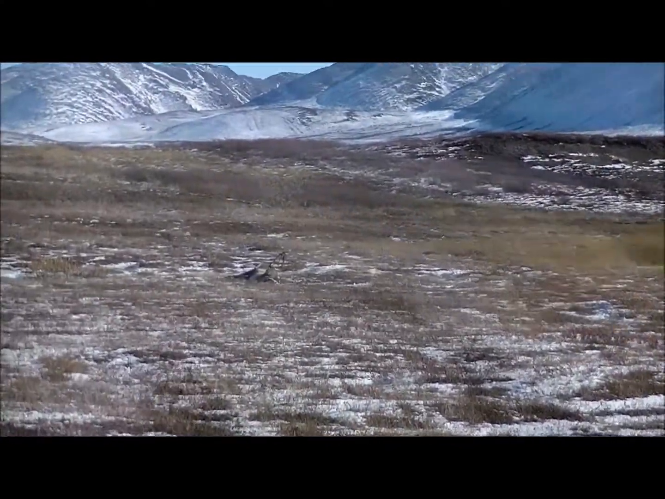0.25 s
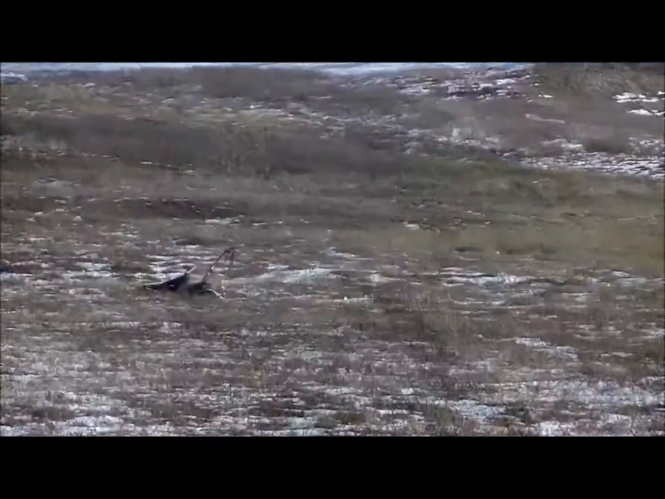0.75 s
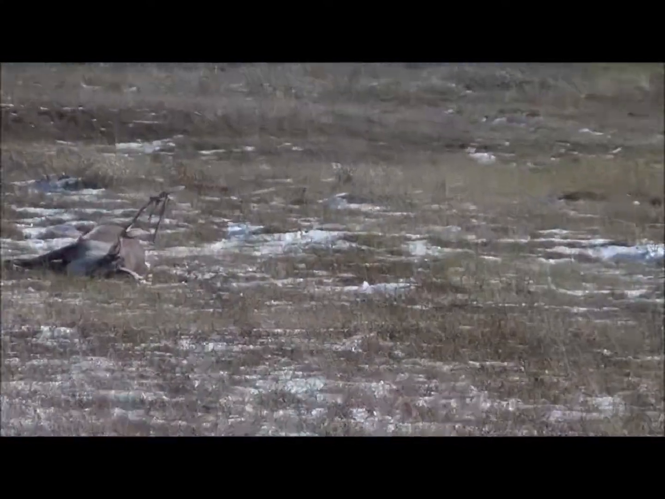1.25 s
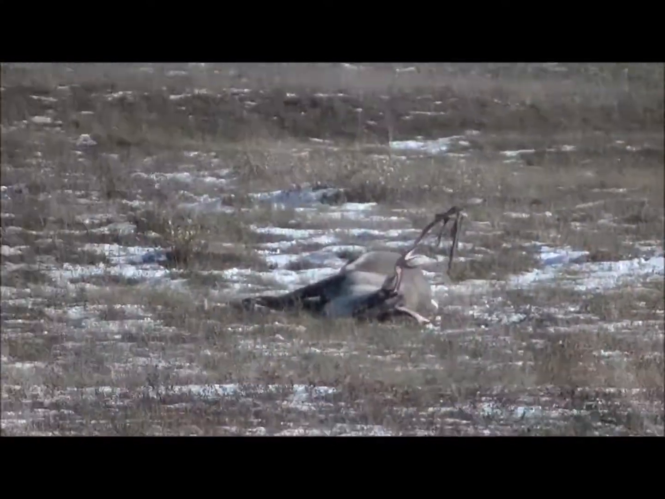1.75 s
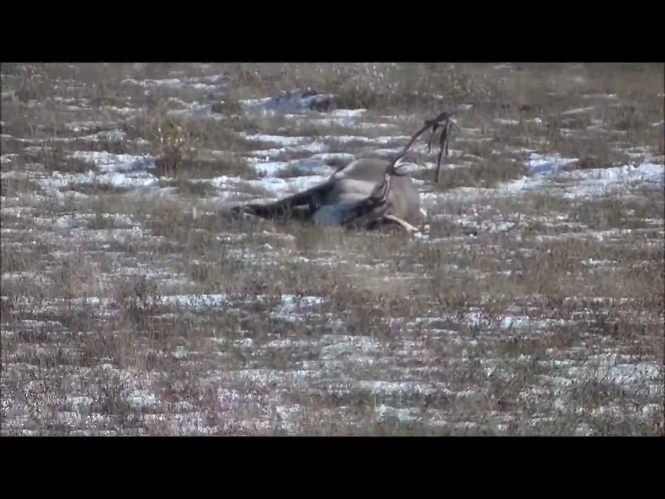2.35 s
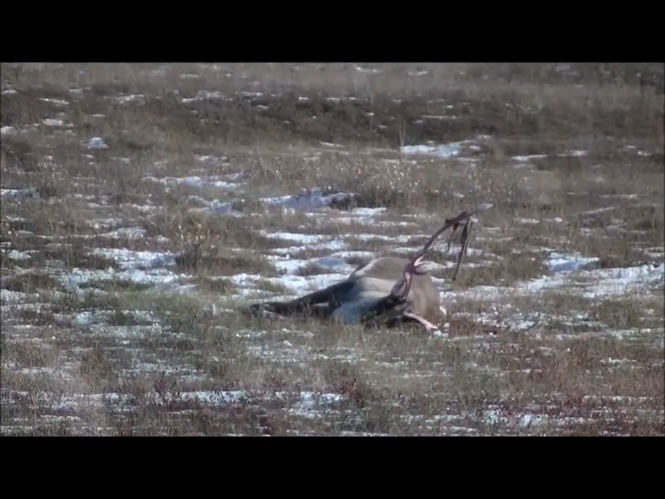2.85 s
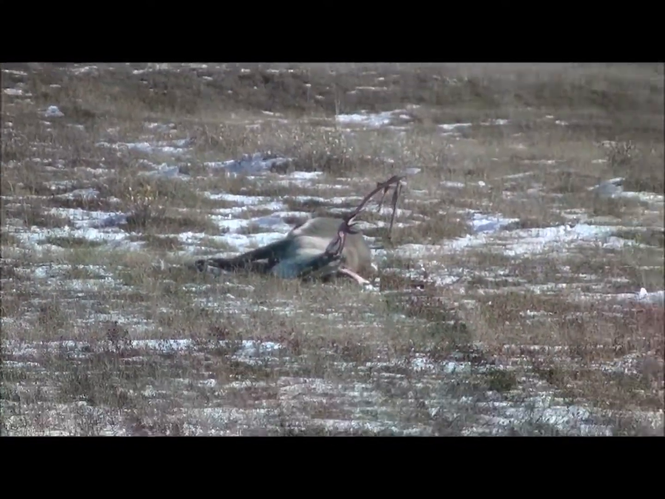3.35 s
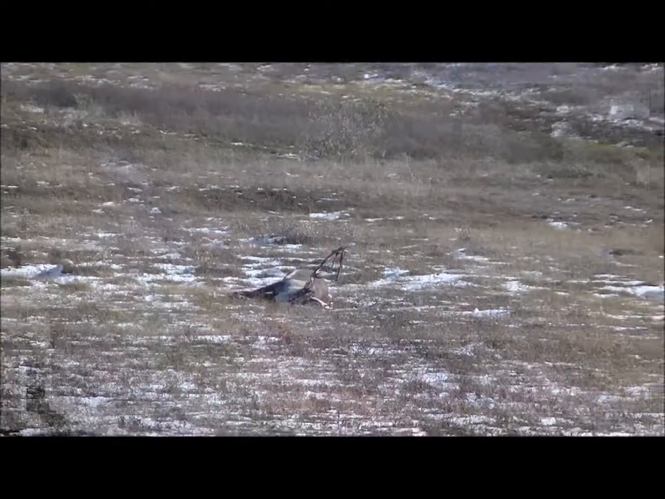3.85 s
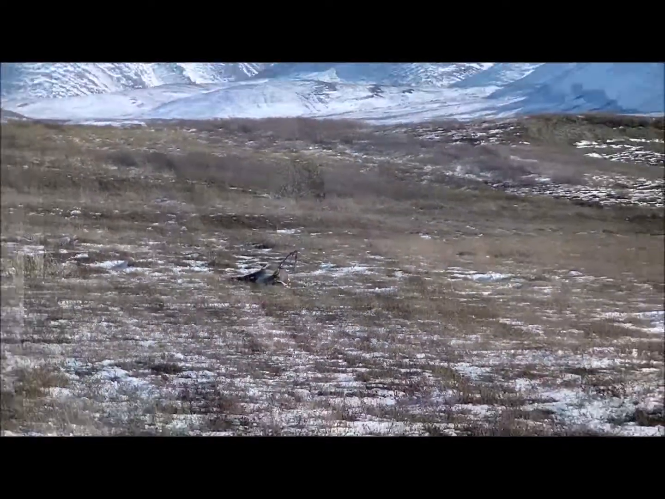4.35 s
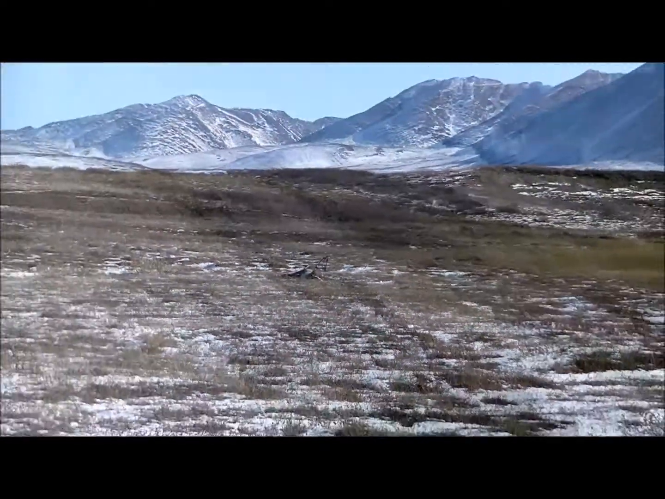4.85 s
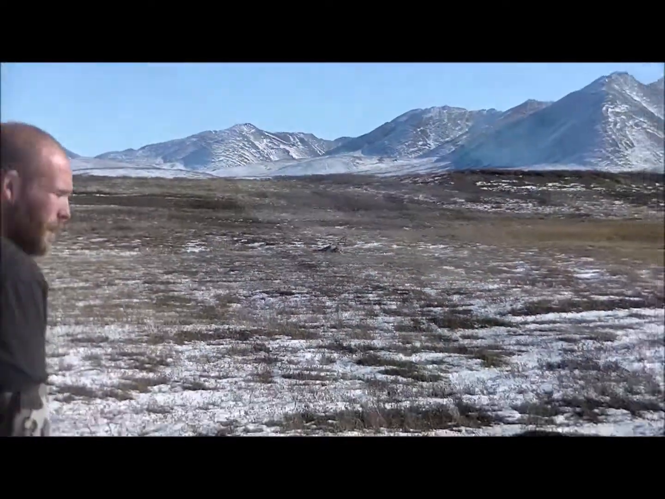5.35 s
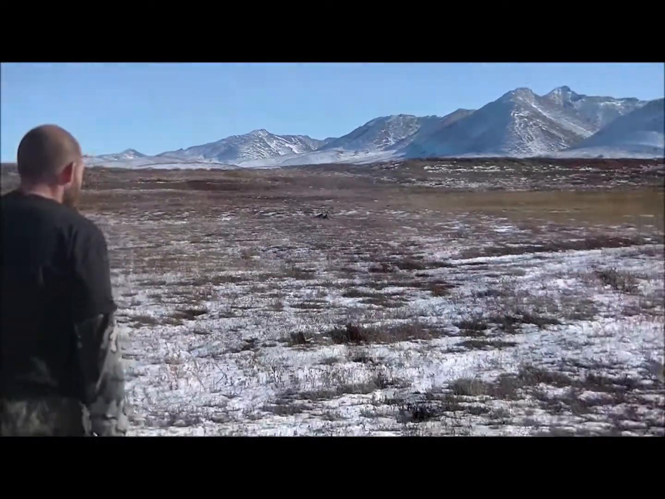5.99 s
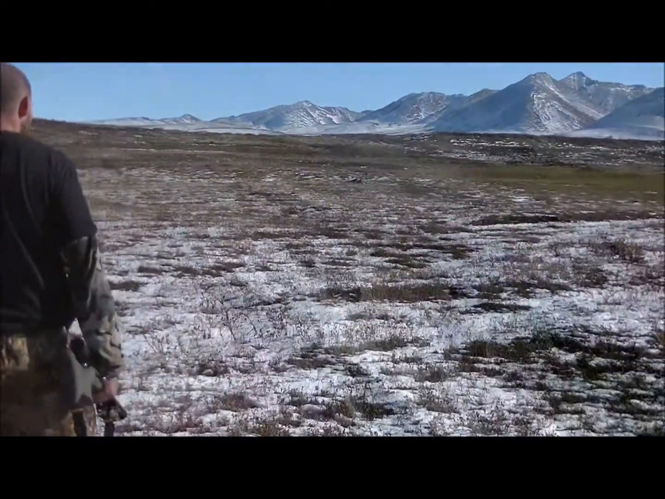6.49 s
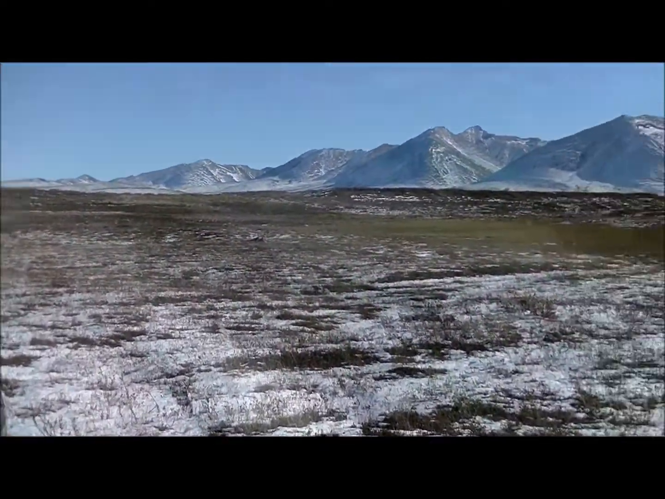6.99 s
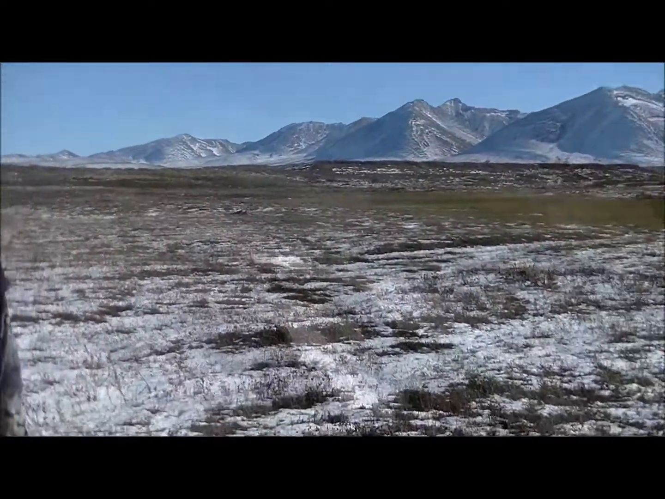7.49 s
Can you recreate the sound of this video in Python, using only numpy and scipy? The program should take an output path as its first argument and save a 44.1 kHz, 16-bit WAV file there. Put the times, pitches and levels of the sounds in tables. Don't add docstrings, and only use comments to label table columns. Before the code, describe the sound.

Very close, dry camera handling noise over soft microphone hiss. Light clicks and rubbing, a short steady motor whine, and a hard bright snap come first. Tiny rapid ticks chatter in the quieter gap. A second, nearly three-second motor run follows, smooth and slightly softer. It ends in heavy knocks and clicks, then scratchy scuffs and small taps continue to the end on open ground.

```python
import sys
import numpy as np
from scipy import signal
from scipy.fft import rfft, irfft
from scipy.io import wavfile
from scipy.ndimage import uniform_filter1d

SR = 44100
rng = np.random.default_rng(int(sys.argv[2]) if len(sys.argv) > 2 else 0)


def elevation(decibels):
    levels = np.asarray(decibels, float)
    return 10 ** (levels / 20)


def dump_mix(stems):
    frames = np.atleast_2d(stems).T
    limited = np.clip(frames, -1, 1)
    pcm = np.round(limited * 32767).astype(np.int16)
    wavfile.write(sys.argv[1], SR, pcm)


N = 340672
TIME = np.arange(N) / SR
HZ = np.fft.rfftfreq(N, 1 / SR) + 1
FIELD_HZ = 59.94


def on_log(points):
    hz, db = np.transpose(points)
    return np.interp(np.log(HZ), np.log(hz), db)


def noise(points, peaks=(), side_db=0.):
    # f/Hz, level/dB
    ports = [(60, -29), (300, -16.5), (700, -15), (1300, -18), (2400, -7.5), (4400, -5.5), (8000, -3),
             (15000, -3)]
    db = on_log(points)
    for centre_hz, width_hz, peak_db in peaks:
        db = db + peak_db / (1 + (2 * (HZ - centre_hz) / width_hz) ** 2)
    db = db - 18 * np.maximum(np.log2(points[0][0] / HZ), 0)
    mid, side = rfft(rng.standard_normal((2, N))) * elevation(db)
    side = side * np.minimum(elevation(on_log(ports) + side_db), 1)
    pair = irfft(np.array([mid + side, mid - side]), N)
    return pair / np.std(pair.mean(axis=0))


def walk(rate):
    hold = int(SR / rate)
    x = np.repeat(rng.standard_normal(N // hold + 1), hold)[:N]
    for _ in range(3):
        x = uniform_filter1d(x, hold)
    return x / x.std()


def curves(table):
    s, *columns = np.transpose(table)
    return [np.interp(TIME, s, column) for column in columns]


def swells(table):
    fade_db = 9.5
    return np.sqrt(sum(elevation(2 * (db - fade_db * np.abs(TIME - s) / length)) for s, db, length in table))


def add(out, s, sound, pan_db=0.):
    i = int(s * SR)
    sound = sound[..., :N - i]
    out[:, i:i + sound.shape[-1]] += sound * elevation(np.array([[pan_db], [-pan_db]]) / 2)


def microphone_hiss():
    # f/Hz, level/dB per Hz
    hiss = [(18, -36), (30, -2), (59, -4), (115, -3.5), (194, -11), (280, -3), (311, -6), (554, -10),
            (600, -19), (684, -21), (822, -12), (1130, -11.5), (4300, -9), (8080, -11), (16000, -18)]
    return elevation(-62.5 - 0.3) * noise(hiss, side_db=14.5)


def sensor_whistle():
    return elevation(-83) * np.sqrt(2) * np.sin(2 * np.pi * 131.25 * FIELD_HZ * TIME)


def hand():
    # f/Hz, level/dB per Hz
    bright_colour = [(1470, -11.5), (2500, 1), (3720, -6.5), (4840, 2.5), (6500, -4), (9580, -9.5),
                     (11400, -11.5), (15200, -17), (16000, -40)]
    dull_colour = [(350, -36), (500, -7), (800, -2.5), (1200, 0.5), (1800, 6.5), (2600, 4.5), (3600, 5),
                   (5000, -21)]
    cavity_colour = [(2800, -42), (3700, -6), (4400, 0), (4800, -1), (5300, -20), (6200, -50)]
    rumble_colour = [(12, -54), (20, -4), (59, -8), (125, -1), (184, -2.5), (392, -4), (520, -9.5),
                     (594, -28), (700, -25), (910, -55), (1540, -120)]
    # f/Hz, width/Hz, level/dB
    shell_peaks = [(7350, 770, 6.5), (9720, 1250, 11.5)]
    dull_peaks = [(1167, 43, 6.5), (1460, 35, 2), (1834, 140, 3.5), (2470, 92, 5.5)]
    # t/s, pressure/dB, sliding (airy above dull)/dB
    pressure = [(0, -61, 4.5), (.15, -56.5, -3), (.52, -55.5, -5.5), (1.31, -54, -7), (1.58, -55.5, 3.5),
                (1.76, -60, -13), (2.64, -75.5, -12), (3.1, -66, -6.5), (3.25, -54, -12), (3.53, -60, -7),
                (5.25, -59, -10.5), (6.05, -53, -4.5), (6.23, -50.5, -1), (6.45, -54, -2), (6.83, -47, -2),
                (7.12, -53, 0), (7.52, -51, -2), (7.6, -56.5, 0)]
    # t/s, peak/dB, length/s
    stroke_rows = [(.34, -51.5, 0.2), (.76, -52, 0.099), (1.44, -51.5, 0.04), (1.5, -65, .04),
                   (5.91, -58, 0.069), (6.19, -42.5, 0.016), (6.475, -54, .015), (6.53, -48, 0.027),
                   (6.56, -46, 0.04), (6.69, -48, .05), (6.74, -54, .015), (6.79, -47, 0.035),
                   (6.86, -43, 0.032), (6.94, -48, 0.025), (7.01, -49.5, 0.03), (7.035, -49, .012),
                   (7.35, -54, 0.13), (7.46, -49, .03)]
    shift_rows = [(0, -63.5, 0.13), (.23, -65, 0.24), (.75, -66.5, 0.35), (1.44, -56.5, 0.13),
                  (1.58, -62, 0.065), (2.0, -71.5, 0.31), (3.05, -65, 0.17), (5.31, -63.5, 0.19),
                  (5.61, -60, 0.17), (5.9, -55.5, 0.17), (6.07, -50.5, 0.033), (6.19, -40, 0.026),
                  (6.33, -45.5, 0.025), (6.43, -48, 0.012), (6.55, -43.5, 0.019), (6.9, -60, 0.68),
                  (7.16, -51, 0.034), (7.4, -62, .08), (7.55, -58.5, 0.12), (7.72, -61, 0.045)]

    dull_db, sliding_db = curves(pressure)
    strokes = swells(stroke_rows)
    scuff = walk(30)

    bright_gain = np.hypot(elevation(dull_db + sliding_db), strokes)
    bright = noise(bright_colour, shell_peaks) * bright_gain * elevation(-0.2 + 0.8 * scuff + 1.4 * walk(220))

    cavity_gain = np.hypot(elevation(dull_db + 0.64 * sliding_db - 2), elevation(-6.0) * strokes)
    cavity = noise(cavity_colour) * cavity_gain * elevation(-2.5 + 0.9 * scuff + 1.2 * walk(150))

    dull = noise(dull_colour, dull_peaks) * elevation(dull_db - 4.0 + 1.1 * scuff + 1.1 * walk(120))

    still_grip_db = -76
    rumble_gain = np.hypot(swells(shift_rows), elevation(still_grip_db))
    rumble = noise(rumble_colour) * rumble_gain * elevation(2.2 * walk(35))
    return bright + cavity + dull + rumble


def knocks():
    # t/s,
    # peak/dB, cycles, slap/dB
    palm = [(.016, -47, 0.75, -15), (1.986, -59, 1.8, -14), (3.73, -59, 1.3, -25), (4.862, -50, 1.1, -25),
            (6.24, -38.5, 2.3, -10), (6.322, -37.5, 1.4, -6), (6.41, -39.5, 0.55, -25),
            (6.537, -41, 1.1, -7), (7.366, -44.5, 0.67, -21), (7.426, -44.5, 0.93, -23),
            (7.53, -47.5, 0.8, -14)]
    thumb = [(1.42, -42, 0.65, -8), (1.498, -41, 1.8, -9), (1.53, -57, 5.6, -25), (1.822, -55, 0.94, -24),
             (3.211, -50.5, 1.5, -2), (3.272, -54, 3.9, -18), (5.296, -55, 0.9, 11), (6.06, -43.5, 0.65, 3),
             (6.109, -36, 0.6, -11), (6.184, -18.5, 1.53, -36), (6.19, -15, 0.5, -19), (7.691, -51, 0.6, 1)]
    knuckle = [(2.915, -39.5, 0.57, -1.5), (6.569, -44, 1.2, 5), (7.323, -47, 1.1, 1.5),
               (7.489, -42.5, 1.1, -13)]
    fingertip = [(.287, -54.5, 3.6, -25), (3.006, -34, 0.4, -18), (6.814, -51.5, 0.75, 6),
                 (6.978, -36, 0.51, -4), (7.031, -50, 0.48, 2.5), (7.161, -34, 1.14, -1.5),
                 (7.657, -51, 1.2, -17)]
    touches = [(palm, 134), (thumb, 238), (knuckle, 306), (fingertip, 407)]

    out, t = np.zeros((2, N)), np.arange(4096) / SR
    leather = signal.butter(3, (350, 1050), "band", fs=SR, output="sos")
    slap_s = .002
    for events, hz in touches:
        for s, db, cycles, slap_db in events:
            x = t * hz / cycles
            swing = x * np.exp(1 - x) ** 1.26 * np.sin(2 * np.pi * hz * t)
            burst = rng.standard_normal(4096) * t / slap_s * np.exp(1 - t / slap_s)
            slap = signal.sosfilt(leather, burst)
            swing = swing / np.abs(swing).max()
            slap = slap / np.abs(slap).max()
            add(out, s, elevation(db) * (swing + elevation(slap_db) * slap))
    return out


def clicks():
    # t/s, peak/dB, length/ms, left minus right/dB
    latch = [(.048, -27, 1.5, -2), (1.345, -31, 1.4, -4), (3.201, -25, 1.2, -3.5), (3.207, -35, 6, -1)]
    spring = [(1.166, -32, 4.9, -1.5), (1.334, -34, 3.7, -1), (7.44, -48, 5, -1)]
    body = [(.055, -43, 7.2, -1.5), (2.9155, -32, 1.3, -3), (5.297, -41.5, 5.8, 1)]
    rocker = [(1.168, -33, 1.4, -2), (1.198, -44, 2.6, -1.5), (1.506, -35.5, 2, 0), (1.584, -40, 5.6, -1),
              (5.379, -47, 2, 0), (6.0835, -18, 0.83, 1), (7.21, -44, 5.7, 5), (7.439, -31.5, 3.3, 1)]
    lens = [(.047, -30.5, 2.7, 2), (3.2, -31, 2, 2), (5.85, -36.5, 16, -4)]
    grip = [(.772, -38, 14, 2), (3.404, -56, 8.3, -.6), (5.85, -38, 17, 2), (6.058, -35, 19, 4),
            (6.176, -42, 8.1, -2), (6.185, -18.5, 2.9, -3.5), (6.192, -25, 2.3, 3), (6.2, -35.5, 16, 1)]
    port = [(.729, -38, 0.83, 2), (3.12, -56, 53, -1.1), (5.296, -37, 5.6, 3), (5.32, -53, 160, 3),
            (5.52, -53, 140, 3), (5.525, -46, 2.5, 3), (6.79, -43, 83, 3), (7.258, -37, 7.8, 2),
            (7.32, -51, 130, 3), (7.518, -31, 2, 2), (7.53, -40, 12, 16)]
    buckle = [(.283, -76, 2.9, -4), (1.49, -40, 0.89, -4), (2.575, -49.5, 29, -2.1), (6.56, -29, 0.61, 0),
              (6.595, -37, 1.2, -1)]
    clasp = [(.677, -33.5, .74, -6), (1.503, -31, .77, -1.5), (7.61, -43, 2.9, -9)]
    seam = [(.767, -27, .9, .1), (1.4384, -7, .9, 1), (3.0531, -37, .29, -15.5)]
    strap = [(7.146, -29.5, 23.5, 1)]
    hinge = [(6.95, -49, 126, .6)]
    barrel = [(1.668, -54, 8.6, 0), (1.696, -53, 7.2, 0), (1.732, -52, 11, 0), (1.762, -54, 7, 0),
              (1.906, -55, 6, 0), (1.93, -57, 8, 0)]
    grit = [(6.471, -41, 1.5, -1), (6.509, -35, 1.2, 0), (6.627, -37, 0.74, 1.5), (6.794, -41, 1, 0),
            (6.828, -41, 1, 0), (7.009, -36, 1.5, -1.5), (7.034, -39, 3, 0)]
    seam_ring = [(1.4392, -21, 2.5, 5.1)]
    vent = [(5.383, -45, 8, 1), (5.425, -54, 30, 1), (5.57, -48, 18, 1), (5.603, -47, 3, 1),
            (5.64, -56, 17, 1), (5.76, -52, 20, 1)]
    # f/Hz, width/Hz, level/dB
    plastic = [(1450, 100, 11), (1800, 150, 8), (2300, 300, 5), (3650, 350, 8), (4500, 300, 5),
               (6000, 500, 5), (7800, 700, 6), (10100, 1200, 7)]
    # snaps, low edge and high edge in Hz
    parts = [(latch, 1350, 2100), (spring, 1320, 1600), (body, 900, 3300), (rocker, 1450, 4200),
             (lens, 2400, 3800), (grip, 800, 4800), (port, 4300, 5300), (buckle, 3500, 11000),
             (clasp, 5800, 11000), (seam, 1400, 16000), (strap, 1360, 7000), (hinge, 1070, 1200),
             (barrel, 2850, 3150), (grit, 4000, 14000), (seam_ring, 3300, 4400), (vent, 4300, 5400)]

    out = np.zeros((2, N))
    lead_s = .003
    t = np.maximum(np.arange(16384) / SR - lead_s, 0)
    contact = 1 - np.exp(-t / 0.000069)
    hz = HZ[0] + np.fft.rfftfreq(16384, 1 / SR)
    shell = 0.9 + sum(elevation(db) / (1 + 2j * (hz - f) / width) for f, width, db in plastic)
    ports = np.array([hz ** 0, np.minimum(hz / 6000.0, 1)])
    for events, low_hz, high_hz in parts:
        band = 1 / np.sqrt((1 + (low_hz / hz) ** 16) * (1 + (hz / high_hz) ** 18))
        for s, db, ms, pan_db in events:
            tau = ms / 2000
            chatter = rfft(rng.standard_normal((2, 16384)) * t / tau * np.exp(1 - t / tau))
            chatter = chatter / uniform_filter1d(np.abs(chatter), size=80)
            mid, side = (irfft(chatter * band * shell * ports) * contact)[:, :13000]
            side = 0.68 * side
            pair = np.array([mid + side, mid - side])
            add(out, s - lead_s, pair * elevation(db) / np.abs(mid).max(), pan_db)
    return out


def zoom():
    # start/s, stop/s, hum/dB, third order above hum/dB, gear hiss/dB
    runs = [
        (0.283, 1.479, -47, -7.5, -57.5),
        (3.397, 6.236, -48.5, -14, -57.5),
    ]
    # f/Hz, level/dB
    whine_lines = [
        [(479.1, -75), (1184, -71), (1669, -73), (2519, -73), (2875, -75), (3725, -76), (4043, -75),
         (4317, -72), (4436, -72), (4807, -75)],
        [(479.1, -77), (1798, -76), (2277, -76), (2530, -76), (3117, -79), (3478, -81), (3763, -82),
         (4317, -77), (4436, -74), (4554, -79), (4673, -80), (4797, -84), (5033, -79), (5394, -84)],
    ]
    # f/Hz, level/dB per Hz
    gear_colour = [(240, 7.5), (400, 3.5), (619, -36.5), (987, -3), (1570, 4), (2040, -4.5), (2300, 2),
                   (2740, 0.5), (4420, -9), (13000, -31.5)]
    # f/Hz, width/Hz, level/dB
    gear_peaks = [(976, 110, 9), (1660, 1120, 7), (2247, 120, 6), (4200, 310, 14.5), (6300, 460, 18)]

    step_hz = 2 * FIELD_HZ
    turn = 2 * np.pi * step_hz * TIME
    out = 0
    for (start, stop, hum_db, third_db, gear_db), lines in zip(runs, whine_lines):
        since = np.maximum(TIME - start, 0)
        until = np.maximum(stop - TIME, 0)
        after = np.maximum(TIME - stop, 0)
        running = (1 - np.exp(-since / 0.013)) * np.exp(-after / 0.023)
        meshing = (TIME > start) * np.exp(-after / 0.087)

        brake_db = 3.5 * np.exp(-until / 0.027)
        hum_db = hum_db + 0.5 * np.exp(-since / 0.17) + brake_db
        gear_db = gear_db + 5.5 * np.exp(-since / 0.054) + brake_db

        second = elevation(.35 * walk(30)) * np.sin(2 * turn)
        third = elevation(third_db + 1.2 * walk(20)) * np.sin(3 * turn + 2.5)
        hum = elevation(hum_db) * (second + third)
        whine = 0
        for hz, db in lines:
            order = np.round(hz / step_hz)
            phase = rng.uniform(0, 2 * np.pi)
            whine = whine + elevation(db - 1.5 + 1.5 * walk(9)) * np.sin(order * turn + phase)

        throb = 1 + 0.088 * np.sin(2 * turn)
        gear = noise(gear_colour, gear_peaks, side_db=-0.5) * throb * elevation(0.33 * walk(23.2))
        out = out + np.sqrt(2) * running * (hum + whine) + elevation(gear_db) * meshing * gear
    return out


def focus():
    # first field, steps, fields apart, peak/dB, strongest ring f/Hz
    hunts = [(99, 2, 2, -49, 1810), (105, 1, 1, -51, 1500), (107, 3, 2, -49, 1700), (113, 1, 1, -47, 2000),
             (114, 1, 1, -52, 1600), (115, 1, 1, -45, 1900), (117, 1, 1, -54, 2000), (118, 1, 1, -46, 2570),
             (119, 2, 1, -52, 2300), (121, 1, 1, -46, 1850), (122, 1, 1, -53, 1850), (123, 3, 1, -50, 2200),
             (127, 7, 1, -50, 2000), (135, 1, 1, -44, 1840), (138, 3, 2, -55, 2900), (143, 5, 2, -55, 2600),
             (152, 3, 2, -54, 2000), (157, 1, 1, -52, 3500)]
    # f/Hz, level/dB, time to fall 60 dB/s
    modes = [(1500, -2, 0.017), (1846, 3.5, 0.015), (2220, 1, 0.0086), (2530, 0.5, 0.022), (3010, 2, 0.016),
             (3480, 0, 0.012)]

    out, t = np.zeros((2, N)), np.arange(1024) / SR
    lead_s = 0.00156
    for first, count, apart, peak_db, pitch_hz in hunts:
        for k in range(count):
            s = (first + k * apart) / FIELD_HZ - lead_s
            chance = rng.standard_normal(12)
            ring_hz = pitch_hz * 2 ** (.08 * chance[10])
            ring = 0
            for (hz, db, t60), a, b in zip(modes, chance[:5], chance[5:]):
                off_pitch_db = 6.3 * abs(np.log2(hz / ring_hz))
                level = elevation(db + 2.4 * a - off_pitch_db - 60 * t / t60)
                ring = ring + level * np.sin(2 * np.pi * hz * t + b)
            ring = ring * (1 - np.exp(-t / 0.0006))
            add(out, s, elevation(peak_db - 1 + 0.8 * chance[11]) * ring / np.abs(ring).max(), pan_db=-1.1)
    return out


def scene():
    background = microphone_hiss() + sensor_whistle()
    fingers = hand() + knocks() + clicks()
    return background + fingers + zoom() + focus()


def band_limit(x):
    return signal.sosfilt(signal.butter(12, 16570, fs=SR, output="sos"), x)


def record(dry):
    bass_cut = signal.butter(2, 72, "high", fs=SR, output="sos")
    top_cut = signal.ellip(10, .2, 60, 15800, fs=SR, output="sos")
    mix = signal.sosfilt(top_cut, signal.sosfilt(bass_cut, dry))
    return band_limit(mix)


dry = scene()
out = record(dry)
dump_mix(out)
```